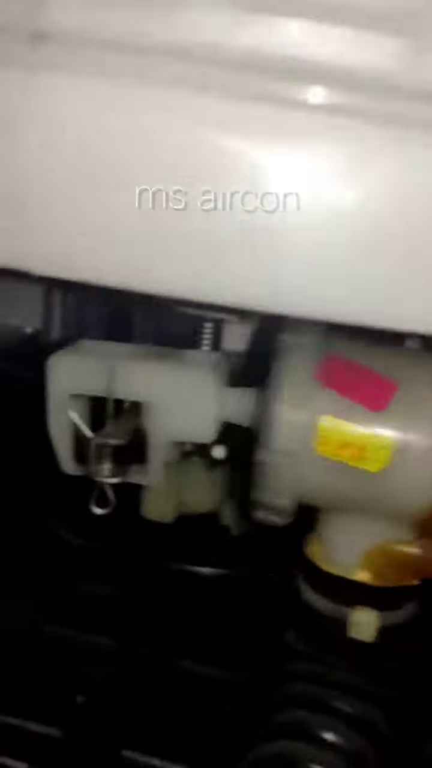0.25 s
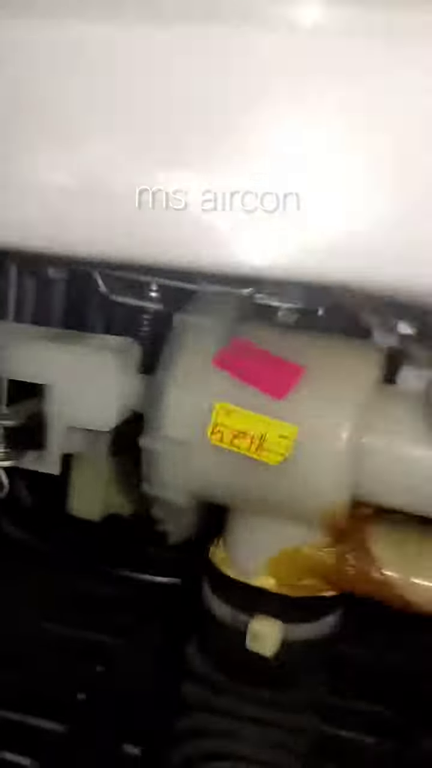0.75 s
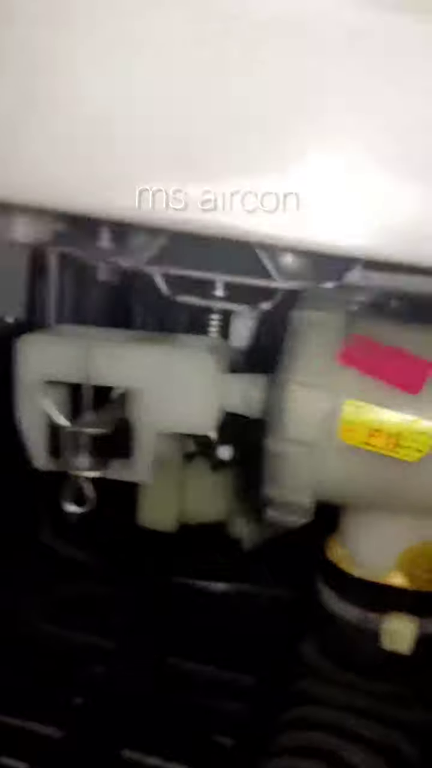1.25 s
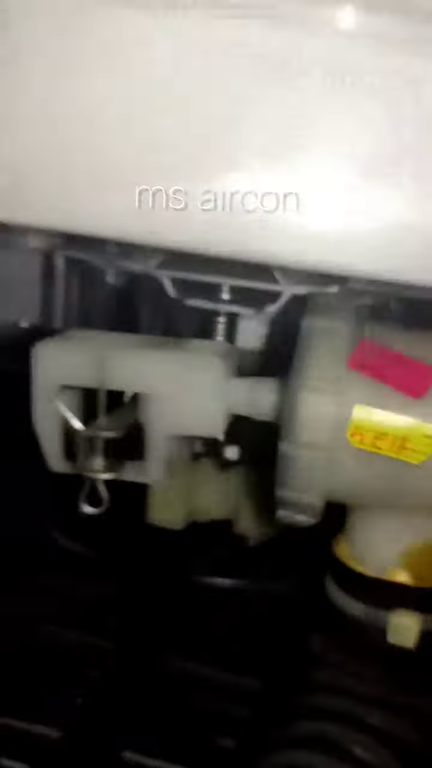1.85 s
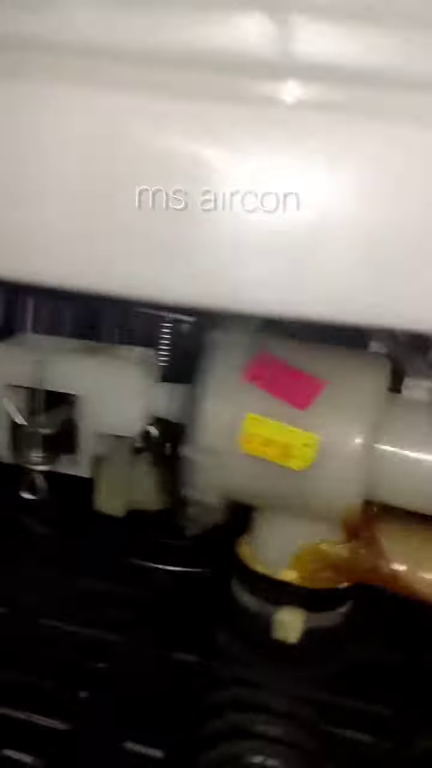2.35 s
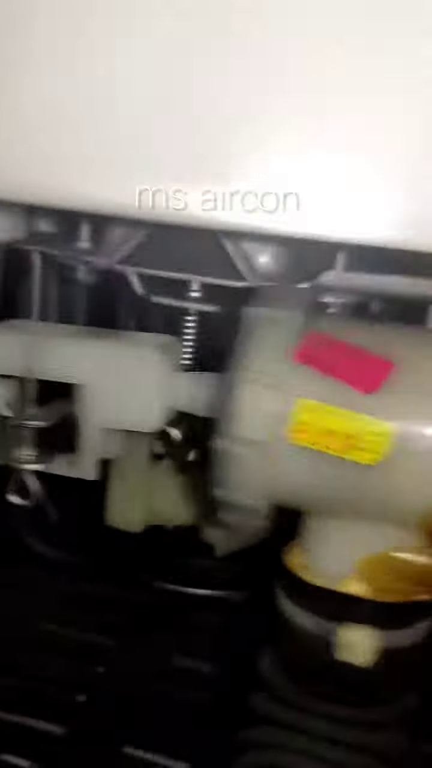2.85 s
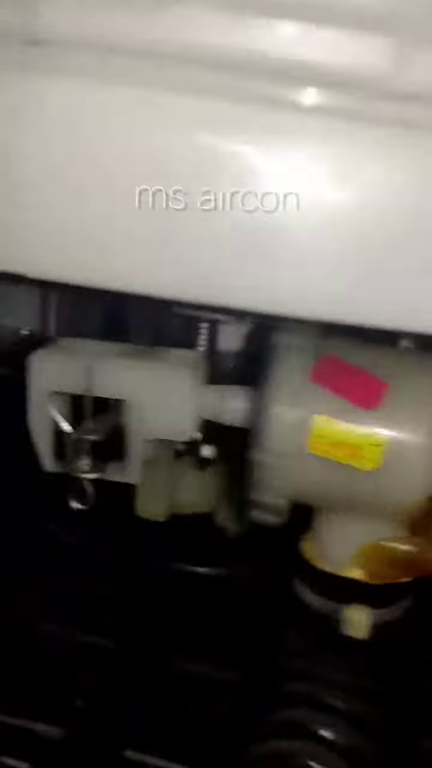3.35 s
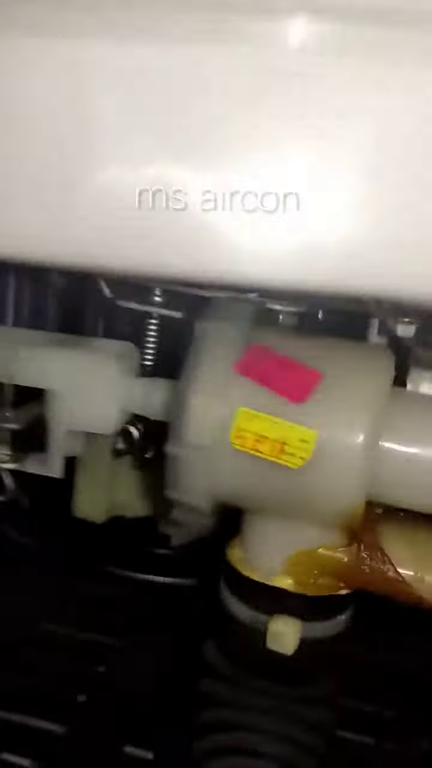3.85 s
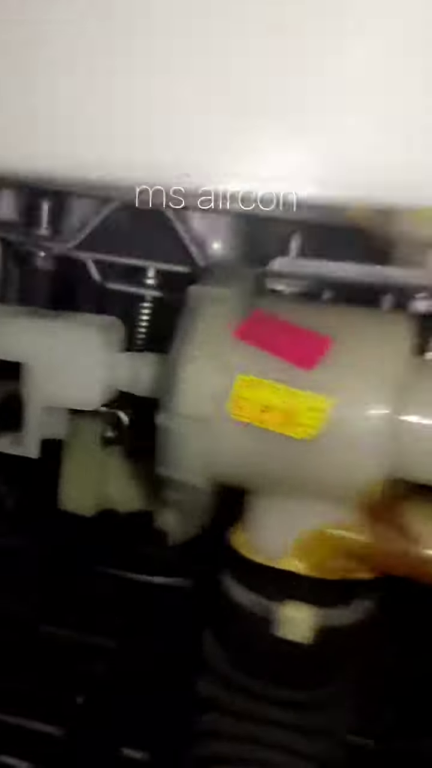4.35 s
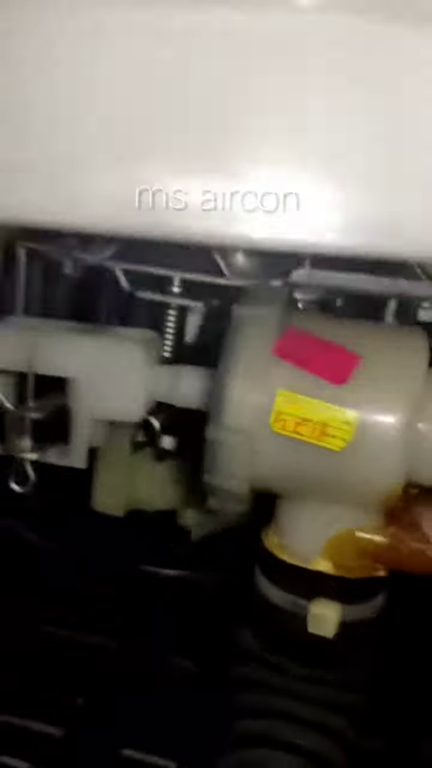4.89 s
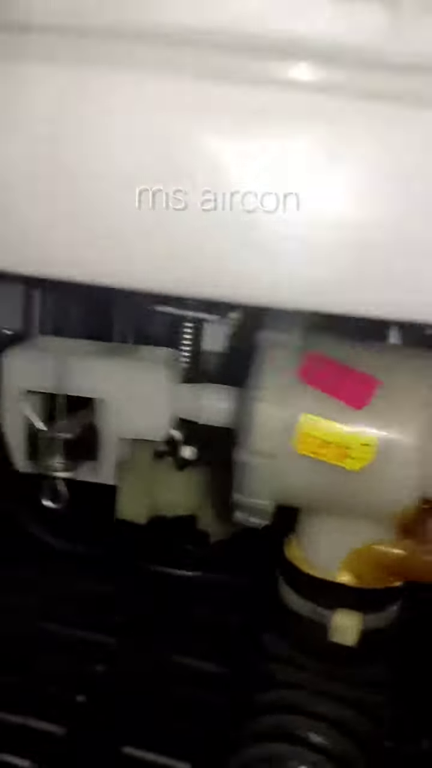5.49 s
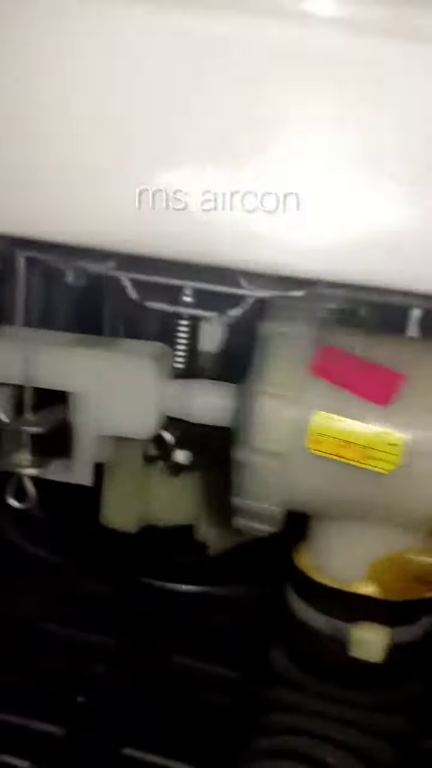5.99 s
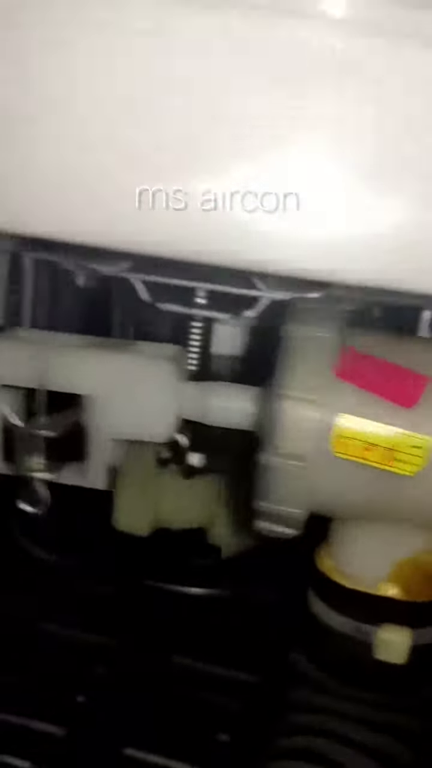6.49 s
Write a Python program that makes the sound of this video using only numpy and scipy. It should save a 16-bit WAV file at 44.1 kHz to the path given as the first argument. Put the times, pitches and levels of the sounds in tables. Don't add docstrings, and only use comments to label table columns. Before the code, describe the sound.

Low electric motor hum and cabinet rumble with loose ticks, a heavy brake thump, brief lull, sharp clunk, then softer uneven running with bumps.

```python
import sys
import numpy as np
from scipy import signal
from scipy.io import wavfile

SR = 44100
rng = np.random.default_rng(int(sys.argv[2]) if len(sys.argv) > 2 else 0)


def materialize(psi):
    bounded = np.clip(np.atleast_2d(psi).T, -1, 1)
    quanta = np.round(bounded * 32767).astype(np.int16)
    wavfile.write(sys.argv[1], SR, quanta)


def gain_from_decibels(decibels):
    exponent = np.asarray(decibels, float) / 20
    return 10 ** exponent


N = 296793


def rms_one(x):
    return x / np.sqrt(np.mean(x ** 2) + 1e-20)


def curve(rows):
    start_s, level_db = np.transpose(rows)
    return np.interp(np.arange(N) / SR, start_s, level_db)


def drift(rate):
    r = np.exp(-2 * np.pi * rate * 40 / SR)
    noise = rng.standard_normal(N // 40 + 2002)
    slow = signal.lfilter([1], [1, -2 * r, r * r], noise)[2000:]
    return np.interp(np.arange(N) / 40, np.arange(len(slow)), rms_one(slow))


def above(x, hz):
    return signal.sosfilt(signal.butter(3, hz, "high", fs=SR, output="sos"), x)


def below(x, hz):
    return signal.sosfilt(signal.butter(3, hz, "low", fs=SR, output="sos"), x)


def part(force, modes, patchy_db, patch_rate):
    out, power = 0, 0
    noise = force * rng.standard_normal(N)
    for k, (hz, width, db) in enumerate(modes):
        r = np.exp(-np.pi * width / SR)
        poles = [1, -2 * r * np.cos(2 * np.pi * hz / SR), r * r]
        zeros = np.array([1, 0, -1]) * (1 - r * r) / 2
        flicker = gain_from_decibels(patchy_db * drift(patch_rate))
        rung = signal.lfilter(zeros, poles, noise * flicker)
        out = out + (-1) ** k * gain_from_decibels(db) * rung
        power += gain_from_decibels(db) ** 2 * np.pi * width / SR
    return out / np.sqrt(power)


def sway(shaking_db):
    # pitch_hz [Hz], width_hz [Hz], level_db [dB]
    springs = [(48.7, 34.6, -19.5), (69, 5.8, -6)]
    return part(gain_from_decibels(-27.5 + 0.34 * shaking_db), springs, patchy_db=1.3, patch_rate=3)


def lurches():
    # middle_s [s], level_db [dB]
    swings = [(0.048, -17), (0.387, -23), (0.711, -25), (0.951, -19.5), (1.199, -21), (1.499, -29),
              (1.742, -25), (2.009, -30), (2.3, -30.5), (2.699, -19.5), (2.947, -17.5), (3.699, -23.5),
              (3.898, -33.5), (4.049, -24.5), (4.279, -21), (4.589, -19.5), (4.871, -18), (5.148, -18.5),
              (5.398, -29.5), (5.869, -27), (6.15, -32), (6.348, -34), (6.579, -23)]
    swing_s, swing_hz = 0.058, 67.5
    out, t = np.zeros(N + SR), np.arange(-SR // 4, SR // 4) / SR
    swing = np.exp(-(t / swing_s) ** 2) * np.sin(2 * np.pi * swing_hz * t)
    for s, db in swings:
        out[round(s * SR):][:len(t)] += gain_from_decibels(db) * swing
    return out[len(t) // 2:][:N]


def squeaks():
    # middle_s [s], half_length_s [s], pitch_hz [Hz], level_db [dB]
    slips = [
        (2.872, .09, 2030, -55),
        (2.927, 0.028, 2750, -56),
        (3.61, 0.088, 1830, -61),
        (4.178, .04, 1970, -51.5),
        (4.344, 0.027, 1570, -44),
    ]
    out, t = np.zeros(N), np.arange(N) / SR
    for s, half, hz, db in slips:
        out += gain_from_decibels(db) * np.exp(-((t - s) / half) ** 4) * np.sin(2 * np.pi * hz * t)
    return out


def dragging():
    # start_s [s], length_s [s], level_db [dB]
    drags = [
        (3.876, .1, -33),
        (3.966, .15, -30),
        (4.283, 0.11, -32),
        (4.567, 0.069, -35),
    ]
    rise_s, fall_s = 0.039, 0.025
    force, t = np.zeros(N), np.arange(N) / SR
    for s, length, db in drags:
        swell = np.clip((t - s) / rise_s, 0, 1)
        fade = np.exp(-np.maximum(t - s - length, 0) / fall_s)
        force += gain_from_decibels(db) * swell * fade
    return force


def groan(drag):
    # pitch_hz [Hz], width_hz [Hz], level_db [dB]
    drag_modes = [(1570, 63, 3.5), (1420, 61, -1), (1730, 50, -9), (2190, 60, -11.5), (690, 33, 12.5),
                  (885, 35, 9.5), (364, 45, 16.5)]
    return part(drag, drag_modes, patchy_db=0.0, patch_rate=17)


def drives(shaking_db, drag):
    # full_speed_db [dB], share of the shaking's swing in dB that it follows [ratio]
    followed = [
        (-20.5, 0.49),
        (-34, 0.78),
        (-45.5, 0.5),
        (-50, 1),
    ]
    cabinet, tub, brackets, small = [gain_from_decibels(db + share * shaking_db) for db, share in followed]
    return cabinet, tub + gain_from_decibels(-8) * drag, brackets + gain_from_decibels(-7.5) * drag, small + gain_from_decibels(-20) * drag


def knock_forces(rise_s, tail_db, tail_s):
    # start_s [s], edge_db (bright) [dB], body_db [dB], length_s [s]
    rocking_knocks = [(0.349, -27, -30.5, 0.014), (0.673, -32, -27, 0.03), (0.8855, -27.5, -19.5, 0.021),
                      (0.916, -46.5, -34.5, 0.023), (1.457, -34.5, -32.5, 0.026),
                      (1.487, -30, -23.5, 0.013), (1.524, -35.5, -22, 0.018), (1.551, -29, -23, 0.011),
                      (2.3148, -12, -24.5, 0.012), (2.332, -33.5, -34.5, .01), (2.419, -43, -24.5, 0.015),
                      (3.06, -34.5, -25.5, 0.015), (4.241, -28, -21, 0.026), (4.291, -33.5, -23, 0.028),
                      (4.514, -45, -32, 0.02), (4.586, -45.5, -48, 0.036), (5.019, -34, -28.5, 0.02),
                      (5.054, -38, -27, 0.018), (5.0984, -31.5, -23.5, 0.021), (5.5332, -38.5, -29.5, 0.03),
                      (5.7, -23.5, -20, 0.023), (5.845, -30, -22, 0.015), (6.08, -28.5, -22, 0.032),
                      (6.426, -34, -24, 0.024), (6.482, -32, -33.5, 0.032), (6.643, -42, -37, 0.027)]
    # start_s [s], edge_db (bright) [dB], body_db [dB], length_s [s]
    stop_knocks = [
        (3.2336, -23.5, -11, 0.04),
        (3.273, -46.5, -25.5, 0.055),
        (3.3363, -38.5, -25.5, 0.018),
        (3.442, -35, -31.5, 0.022),
        (3.456, -35.5, -21.5, 0.029),
        (3.4847, -38.5, -21, 0.031),
        (3.8145, -37.5, -26.5, 0.022),
        (3.849, -25.5, -17.5, 0.024),
    ]
    # start_s [s], level_db [dB], length_s [s]
    ticks = [(0.081, -52, .012), (0.304, -30.5, 0.011), (1.177, -40.5, 0.045), (1.668, -49.5, .01),
             (1.787, -38.5, 0.033), (2.201, -42, .012), (2.395, -34.5, .012), (2.718, -48.5, 0.0079),
             (2.746, -50, .01), (2.86, -57, 0.0083), (2.908, -44, .027), (3.692, -47, 0.015),
             (3.764, -53.5, .015), (3.915, -33, 0.014), (4.674, -46.5, 0.031), (4.883, -38, 0.012),
             (5.192, -44, 0.011), (5.255, -42, 0.034), (5.417, -49.5, .015), (5.797, -53.5, 0.011),
             (5.978, -45, 0.028), (5.365, -50, 0.023), (5.502, -42.5, 0.012), (5.65, -39.5, 0.043),
             (5.947, -44.5, .012), (6.2536, -39.5, 0.019), (6.596, -35, 0.017), (6.701, -43.5, 0.0077)]
    # start_s [s], level_db [dB], length_s [s]
    jolts = [
        (0.891, -29.5, 0.034),
        (1.525, -31, 0.024),
        (3.066, -39.5, 0.031),
        (3.244, -27.5, 0.034),
        (3.847, -32.5, 0.041),
        (4.286, -36, 0.027),
        (5.718, -32, 0.012),
        (6.079, -26.5, 0.021),
        (6.21, -38, 0.019),
        (6.424, -26, .018),
    ]
    knocks = rocking_knocks + stop_knocks
    knocks += [(s, db, db - 4, length) for s, db, length in ticks]
    hits = []
    for s, edge, body, length in knocks:
        bracket = edge + 0.71 * (body - edge) - 7
        hits.append((s, length, edge, bracket, body, body + 4))
    hits += [(s, length, -99, db, -99, -99) for s, db, length in jolts]
    force, t = np.zeros((4, N + SR)), np.arange(SR // 4) / SR
    for s, length, *levels_db in hits:
        rattle = np.exp(-(t / length) ** 3) + gain_from_decibels(tail_db) * np.exp(-t / tail_s)
        rattle = rattle * np.minimum(t / rise_s, 1)
        at = round((s + rise_s) * SR)
        force[:, at:at + len(t)] += gain_from_decibels(levels_db)[:, None] * rattle
    return force[:, :N]


def small_parts(drive, knock, rocking_db):
    # pitch_hz [Hz], width_hz [Hz], level_db [dB]
    plastic_modes = [(3010, 160, -3.5), (3396, 210, -4), (6053, 610, -6), (6775, 280, 1.5),
                     (6760, 330, 1.5), (7280, 420, 0.5)]
    # pitch_hz [Hz], width_hz [Hz], level_db [dB]
    snap_modes = [(4900, 5600, 0)]
    shaken = drive * gain_from_decibels(rocking_db)
    rattle = part(shaken + gain_from_decibels(-5) * knock, plastic_modes, patchy_db=1.5, patch_rate=15)
    snap = part(gain_from_decibels(-13) * knock + gain_from_decibels(-8.5) * shaken, snap_modes, patchy_db=1.5, patch_rate=20)
    return above(rattle + snap, 2500)


def bracket_rattle(drive, knock, rocking_db):
    # pitch_hz [Hz], width_hz [Hz], level_db [dB]
    bracket_modes = [(1100, 980, -5), (1340, 204, 11), (1320, 253, 7), (1550, 190, -0.5), (1843, 28, -3),
                     (2000, 20, 0), (2091, 160, -4.5), (2360, 85, -0.5), (2493, 220, -10),
                     (2750, 100, -6.5)]
    force = drive * gain_from_decibels(.6 * rocking_db) + gain_from_decibels(-0.76) * knock
    return above(part(force, bracket_modes, patchy_db=1.5, patch_rate=34), 690)


def tub_boom(drive, knock, rocking_db):
    # pitch_hz [Hz], width_hz [Hz], level_db [dB]
    tub_modes = [(401, 64, -2.5), (483, 61, -1), (560, 60.7, 0), (670, 92, -3.5), (806, 40, -5),
                 (880, 67, -8.5), (1027, 50.4, -10.5)]
    # pitch_hz [Hz], width_hz [Hz], level_db [dB]
    struck_modes = [(406, 150, 0), (537, 96, -10.5), (690, 100, -6), (820, 110, -3), (880, 95, 2),
                    (970, 110, -4)]
    force = drive * gain_from_decibels(1.1 * rocking_db) + gain_from_decibels(-9.5) * knock
    drone = part(force, tub_modes, patchy_db=0.34, patch_rate=34)
    return drone + part(gain_from_decibels(-8) * knock, struck_modes, patchy_db=2.3, patch_rate=12)


def cabinet_rumble(drive, knock, pull_db):
    # pitch_hz [Hz], width_hz [Hz], level_db [dB]
    cabinet_modes = [(92.7, 7.5, -5), (117.6, 3.87, -3), (130, 9.86, 0), (143, 11.86, -0.5),
                     (166.7, 4.45, -0.5), (222.1, 15.6, -5), (182, 11.7, -6), (255.7, 33.5, -8),
                     (294, 40.7, -13.5), (326.2, 10.6, -7), (354, 22.2, -18)]
    frame_modes = [mode for mode in cabinet_modes if mode[0] < 190]
    panel_modes = [mode for mode in cabinet_modes if mode[0] > 190]
    frame_drive = gain_from_decibels(np.maximum(pull_db, -26) + 15.5 - 18.5)
    frame = part(frame_drive + gain_from_decibels(-6.5) * knock, frame_modes, patchy_db=2.0, patch_rate=9)
    panels = part(gain_from_decibels(-4) * drive + gain_from_decibels(-8) * knock, panel_modes, patchy_db=2.5, patch_rate=12.2)
    return frame + panels


def bumps():
    # peak_s [s], peak_db [dB], contact_s [s]
    stop_bumps = [(0.536, -5, 0.0012), (2.43, -25.5, 0.0015), (4.011, -7.5, 0.0016), (4.165, -11, 0.0008),
                  (4.236, -5.5, 0.0011), (4.268, -25.5, 0.0015), (4.299, -13.5, 0.0017),
                  (4.436, -10.5, 0.00074), (4.5175, -7.5, 0.001), (4.698, -16, 0.0005),
                  (4.781, -10, 0.0013), (4.945, -5, 0.0011), (5.081, -20, 0.0045), (6.168, -13, 0.00067)]
    out, t = np.zeros(N), np.arange(-SR // 50, SR // 50) / SR
    for s, db, contact in stop_bumps:
        push = 1.4 * np.exp(-(t / contact) ** 2)
        dip = .4 * np.exp(-(t / contact / 3.5) ** 2)
        out[round(s * SR) - len(t) // 2:][:len(t)] += gain_from_decibels(db) * (push - dip)
    return out


def blows(contact_cycles):
    # start_s [s], peak_db [dB], pitch_hz [Hz], t60_s (time to fall 60 dB) [s]
    panel_blows = [(.890, -11, 312.5, 0.17), (1.528, -18, 337, 0.19), (2.318, -45, 3370, 0.034),
                   (2.317, -21, 7440, 0.082), (3.239, -10, 880, 0.06), (3.25, -30, 2360, 0.14),
                   (3.49, -21, 816, 0.067), (3.245, -10, 393, 0.11), (3.245, -28.5, 690, 0.11),
                   (3.265, -6.5, 130, 0.65), (3.27, -8, 192.3, 0.34), (3.448, -27.5, 877, 0.22),
                   (3.853, -6.5, 854, 0.04), (3.87, -7, 126, 0.3), (6.222, -30.5, 1100, 0.031),
                   (4.296, -11.5, 312, 0.12), (5.541, -28.5, 560, 0.043), (5.708, -23.5, 560, 0.13),
                   (5.85, -26.5, 560, 0.11), (6.086, -19.5, 593, 0.051), (6.088, -1.5, 330, 0.038),
                   (6.16, -15, 365, 0.061), (6.435, -10, 355, 0.069), (3.285, -13.5, 325, 0.23),
                   (3.49, -17, 326, .15), (3.86, -13, 330.8, .18), (4.255, -16, 331, 0.2),
                   (5.71, -19, 387, 0.088), (5.85, -19.5, 380, .08), (0.899, -31, 1030, .07)]
    out, t = np.zeros(N + SR), np.arange(SR // 2) / SR
    for s, db, hz, t60 in panel_blows:
        build = 1 - np.exp(-t * hz / contact_cycles)
        out[round(s * SR):][:len(t)] += gain_from_decibels(db - 60 * t / t60) * build * np.sin(2 * np.pi * hz * t)
    return out[:N]


def hum(pull_db):
    hum_hz, start_rad, stop_s, reversal_s = 99.968, -1.72, 3.35, 3.9
    t = np.arange(N) / SR
    backwards = np.clip((t - reversal_s) / .05, 0, 1)
    turned = np.pi * backwards
    waver_db = (0.8 + backwards * (3.0 - 0.8)) * drift(4)
    order_db = np.where(t < stop_s, -4, -3.5 + backwards * (-13 + 3.5))
    second_db = pull_db + order_db + waver_db
    phase = 2 * np.pi * hum_hz * t + start_rad
    first = gain_from_decibels(pull_db) * np.cos(phase - turned)
    second = gain_from_decibels(second_db) * np.cos(2 * phase + 1.3 + turned)
    slot_whine = gain_from_decibels(second_db - 27) * np.cos(6 * phase)
    return np.sqrt(2) * (first + second + slot_whine)


def scene():
    # time_s [s], level_db [dB]
    motor_pull = [(0.0, -14.5), (1.2, -16), (3.22, -16.5), (3.31, -20), (3.38, -34), (3.56, -23),
                  (3.86, -22), (4.08, -26.5), (4.2, -21.5), (4.8, -22.5), (5.5, -22.5), (6.67, -23),
                  (6.73, -14)]
    # time_s [s], level_db [dB]
    tub_shaking = [(0.0, -1), (0.4, 2), (1.0, 0.8), (2.0, 0.5), (2.5, -1), (3.2, 0), (3.3, -13),
                   (3.42, -21.5), (3.6, -12), (3.82, -13), (3.9, 4), (4.2, -6), (4.5, -5.5), (4.95, -1.5),
                   (5.5, -11.5), (5.9, -5), (6.3, -5), (6.73, -5.5)]
    pull_db, shaking_db = curve(motor_pull), curve(tub_shaking)
    drag = dragging()
    cabinet_drive, tub_drive, bracket_drive, small_drive = drives(shaking_db, drag)
    small_knock, bracket_knock, tub_knock, cabinet_knock = knock_forces(rise_s=.0015, tail_db=-13, tail_s=.03)
    rocking_db = 2.3 * drift(26)
    large = cabinet_rumble(cabinet_drive, cabinet_knock, pull_db)
    large += tub_boom(tub_drive, tub_knock, rocking_db)
    large += bracket_rattle(bracket_drive, bracket_knock, rocking_db)
    body = below(large, 3600) + small_parts(small_drive, small_knock, rocking_db)
    body += sway(shaking_db) + lurches() + groan(drag)
    mix = hum(pull_db) + blows(contact_cycles=1.1) + bumps() + squeaks() + body
    return mix[None]


def top_cut(x):
    return signal.sosfilt(signal.butter(12, 8870, fs=SR, output="sos"), x)


def record(dry):
    x = above(dry, 48)
    x = .9 * np.tanh(x / .9)
    x = signal.sosfiltfilt(signal.ellip(12, .2, 22, 7610, fs=SR, output="sos"), x)
    return top_cut(x)


dry = scene()
out = record(dry)
materialize(out)
```